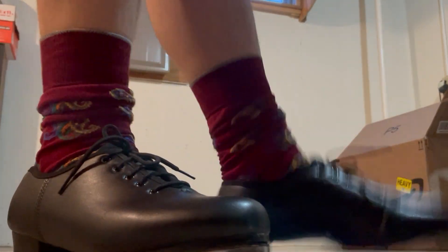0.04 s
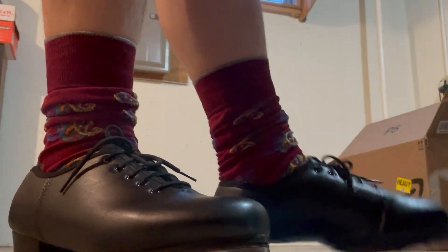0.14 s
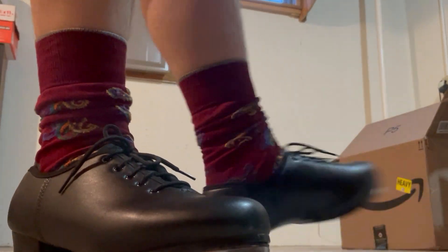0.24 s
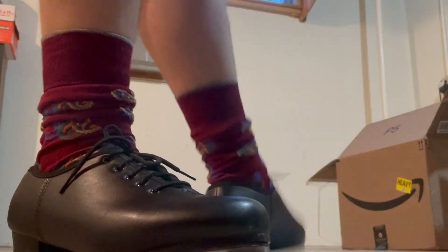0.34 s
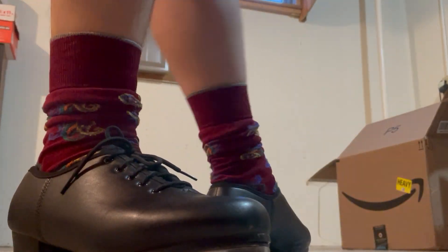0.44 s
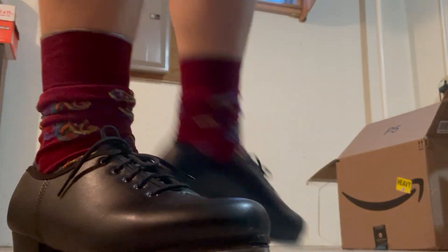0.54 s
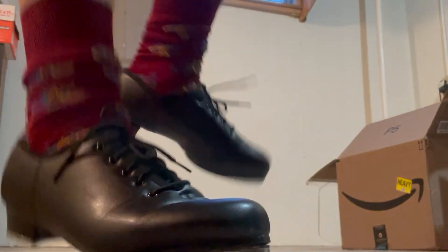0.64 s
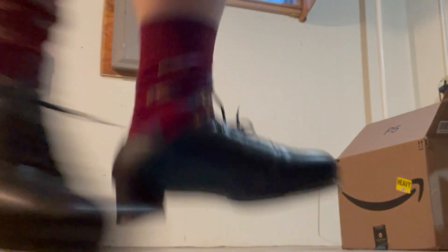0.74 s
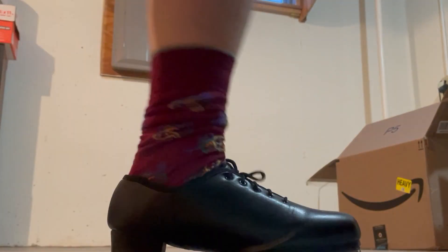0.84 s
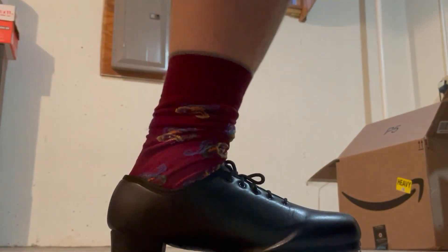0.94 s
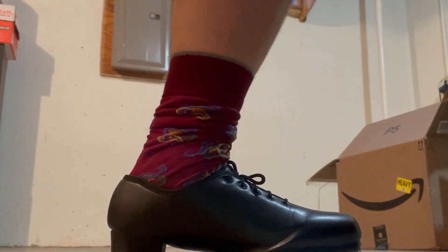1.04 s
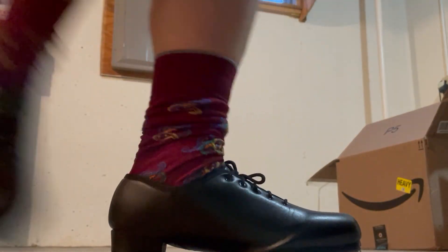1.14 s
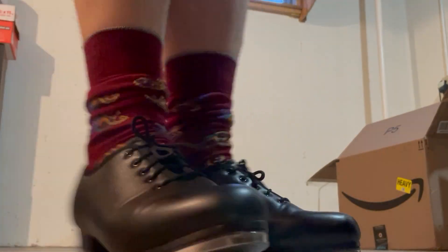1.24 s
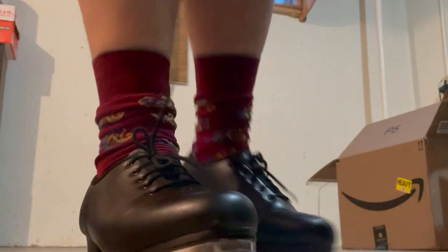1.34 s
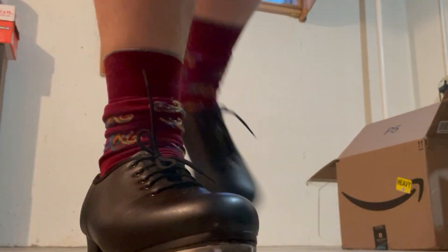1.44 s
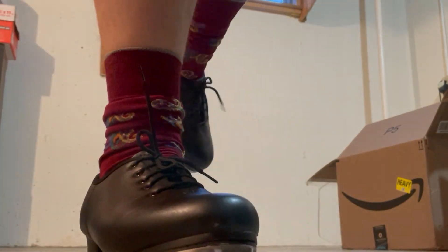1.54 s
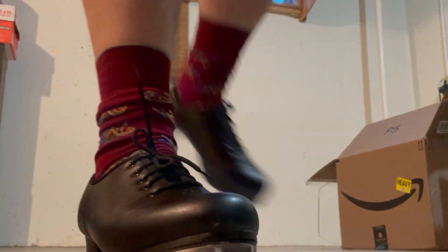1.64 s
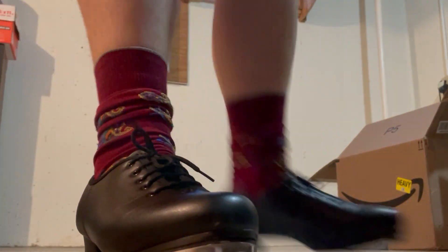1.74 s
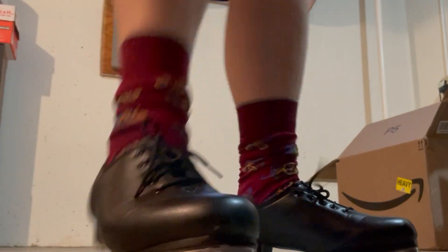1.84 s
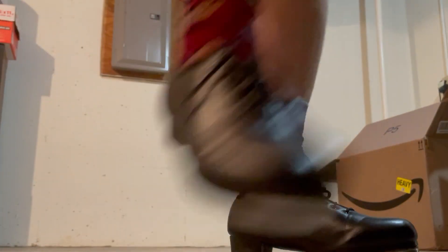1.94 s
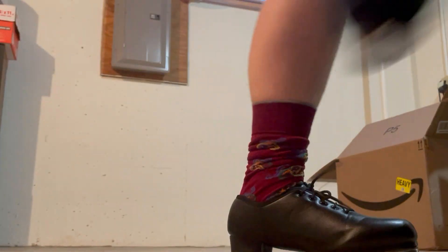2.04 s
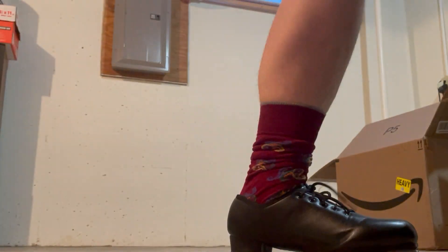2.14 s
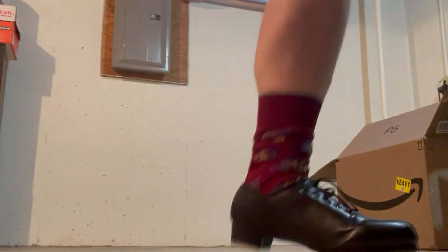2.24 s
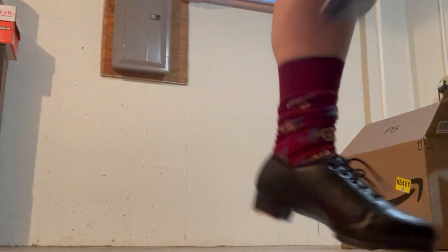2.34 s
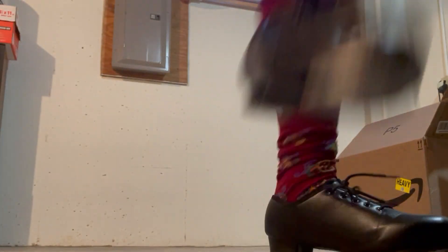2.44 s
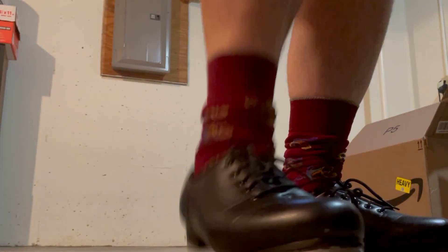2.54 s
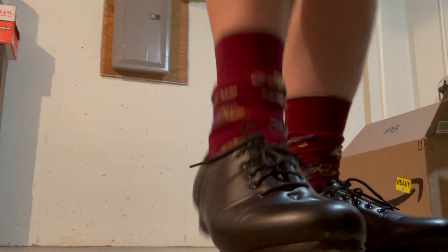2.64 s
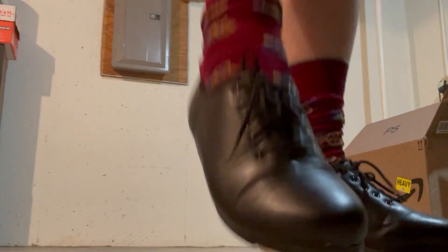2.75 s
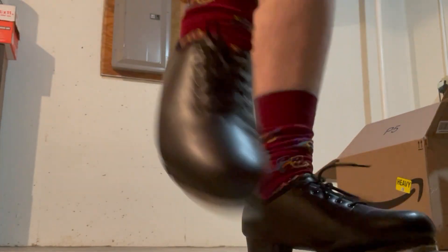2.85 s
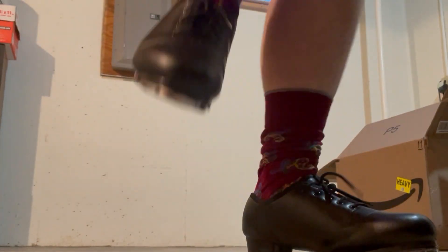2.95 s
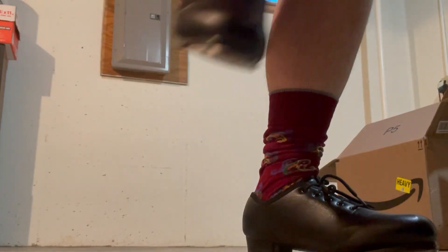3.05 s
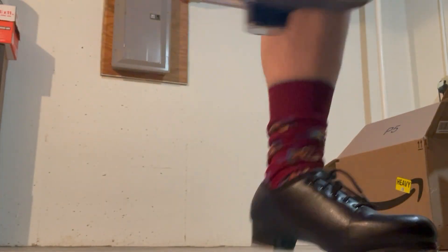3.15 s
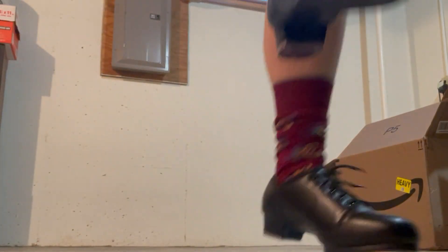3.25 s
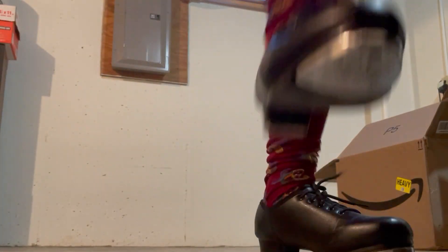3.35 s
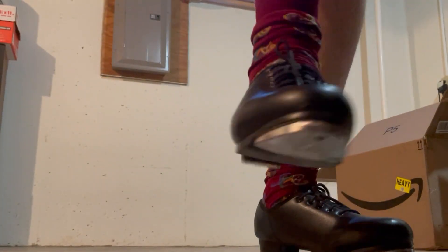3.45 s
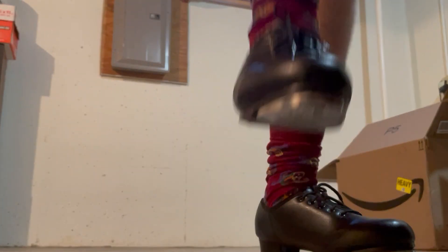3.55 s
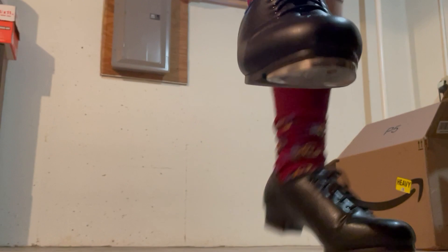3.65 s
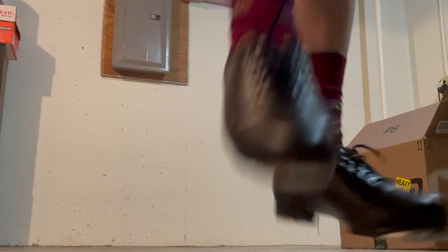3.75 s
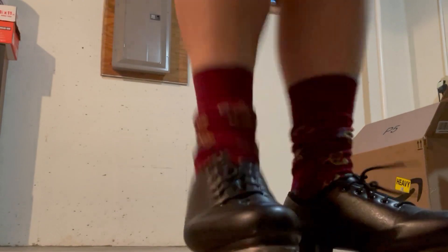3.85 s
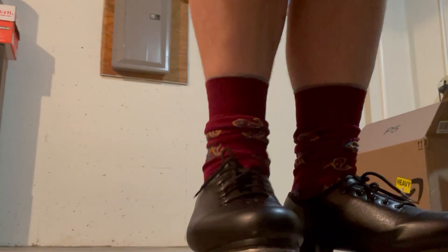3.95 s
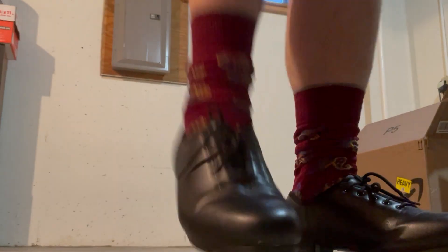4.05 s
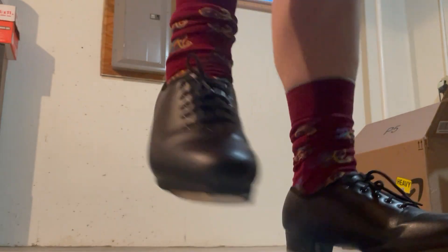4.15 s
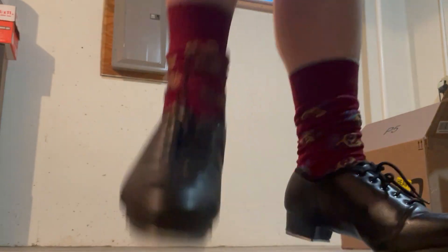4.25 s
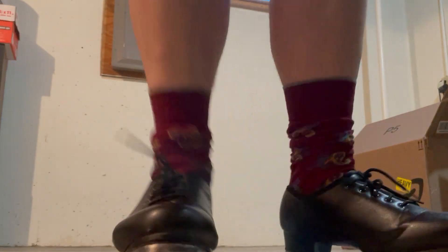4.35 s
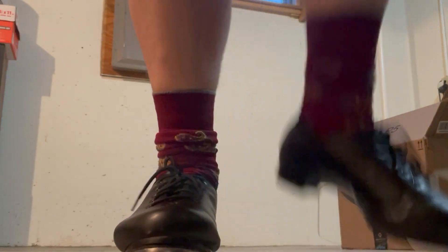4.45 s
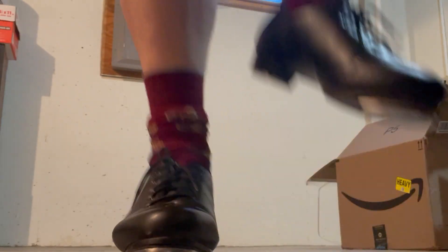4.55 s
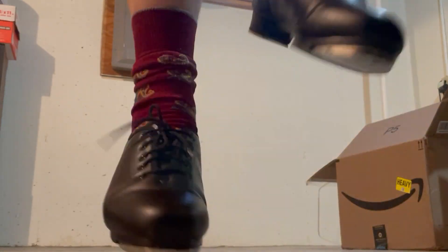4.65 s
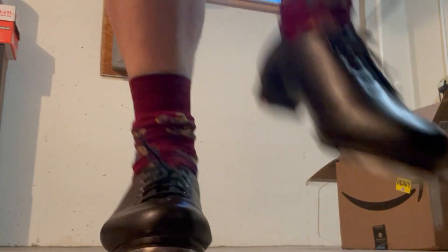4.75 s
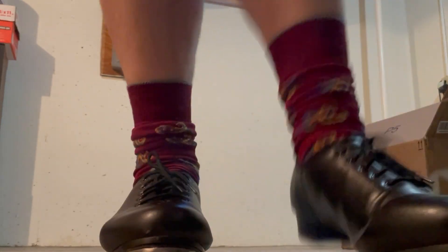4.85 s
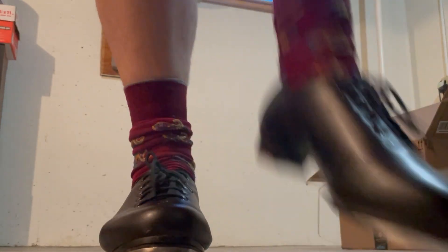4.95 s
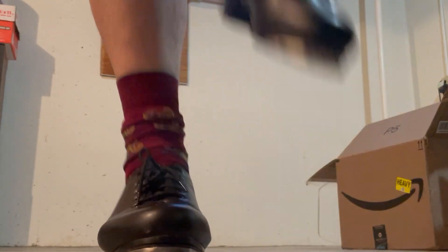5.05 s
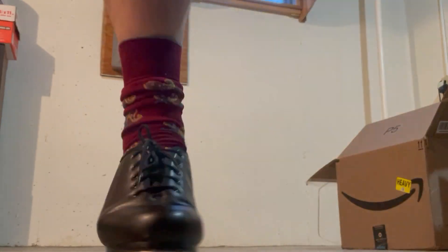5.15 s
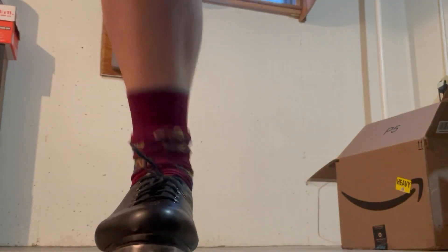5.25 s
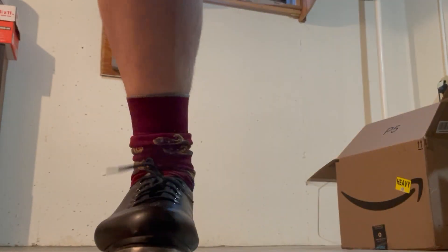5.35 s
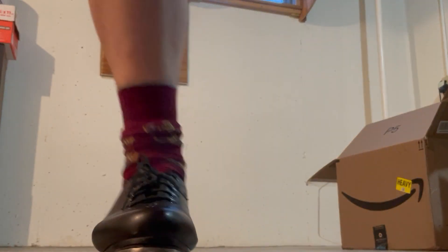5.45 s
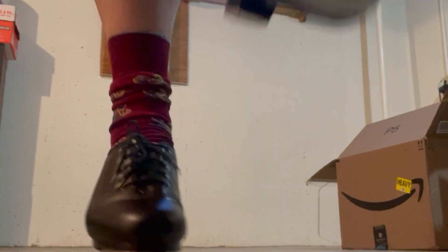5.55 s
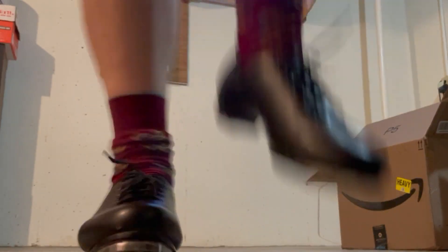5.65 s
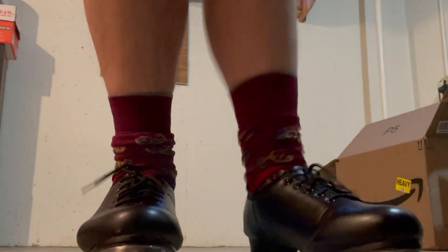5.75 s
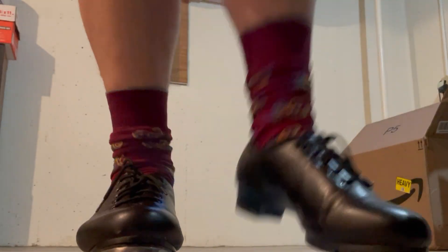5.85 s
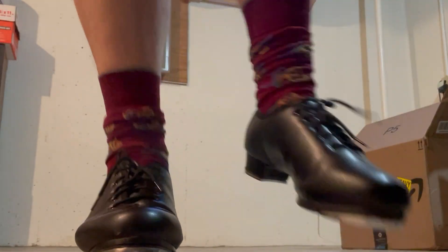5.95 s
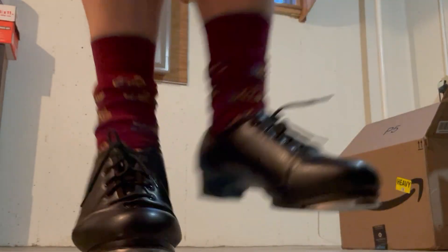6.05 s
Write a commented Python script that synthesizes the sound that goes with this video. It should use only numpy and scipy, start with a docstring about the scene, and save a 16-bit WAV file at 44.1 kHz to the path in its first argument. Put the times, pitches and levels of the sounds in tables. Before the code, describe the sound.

Tap shoes on a hard floor, heard very close from ground level. Sharp metallic clacks with woody heel knocks come alone, in pairs and in tight little rolls, first sparse, then quicker and denser toward the end. Brief sole scuffs brush between some steps. Bare basement walls return a short, bright, boxy reverberation over a very faint hush.

```python
"""A basement with a hard floor and bare walls: tap shoes a step away from a phone lying on the ground.
Chattering contacts drive damped modes of plate, heel and sole: clack, tick, knock and thud, some as echoes.
Dense clicks form scrapes and faint noise swells, noise pulses dull thumps; low room modes boom, a note hums.
Decaying noise bands form the walls' tail, and shaped noise a faint hush, at the phone's two ports."""
import sys
import numpy as np
from scipy import signal
from scipy.fft import rfft, irfft, next_fast_len
from scipy.io import wavfile
from scipy.ndimage import uniform_filter1d

SR = 44100
rng = np.random.default_rng(int(sys.argv[2]) if len(sys.argv) > 2 else 0)


def digitize_waveform(pressure):
    """Quantize a signal to 16-bit integers and store it at the path in sys.argv[1].

    Rows of a 2-D input are taken as channels; values are limited to [-1, 1].
    """
    field = np.atleast_2d(pressure).T
    bounded = np.clip(field, -1, 1)
    quanta = np.round(bounded * 32767).astype(np.int16)
    wavfile.write(sys.argv[1], SR, quanta)


N = 269010

# Plate strikes and their loud early echoes: t/s, clack level/dB, clack f/Hz, then levels/dB re clack:
# knock, thud, tick, rebound, share to the walls
STRIKES_AND_ECHOES = [(0.079, -8.5, 4475, 1, -4, -1.5, -2, -1),
                      (0.3722, -25.5, 2620, -1.5, -4.5, -4, -20, 15),
                      (0.3775, -18, 4560, -4.5, -10, 0, 2.5, -0.5),
                      (0.5385, -36.5, 2200, -4, -20, -15, 2, -13),
                      (0.6265, -39, 2890, -12, -5, -9, -19, -1),
                      (0.6875, -54, 2960, -18.5, 8.5, 7.5, -21.5, 10),
                      (0.7155, -42.5, 2500, 0.5, 5, -5, -13.5, 16.5),
                      (0.7465, -37.5, 2330, -1, -30, 1, -21, 19),
                      (0.784, -10.5, 4070, -17, -40, -5.5, -10, -2.5),
                      (0.79, -13, 3700, -10, -39, -16, -16, 0.5),
                      (0.803, -14, 3850, -6.5, -6.5, 4.5, -1.5, -32),
                      (0.8167, -11, 5050, -2, -2.5, 0, -16.5, -15),
                      (1.1883, -11, 3330, -7, -11, 2, 4.5, -10.5),
                      (1.1945, -13, 3430, -38, -25, -19.5, -4, 2),
                      (1.2005, -11.5, 3660, -13, -44, -12, -17.5, -3.5),
                      (1.2365, -14, 5200, -9, -26.5, -6, -9.5, -15),
                      (1.3145, -23.5, 3440, -6.5, -14.5, 1.5, -31, 3),
                      (1.3335, -24, 4800, 1.5, -21, -24, -11.5, -5),
                      (1.3885, -30.5, 3444, -15, -18, -2, -15.5, -18.5),
                      (1.4765, -40, 2200, -23, -22.5, -31, -19, 8),
                      (1.7788, -9.5, 3040, 2.5, -20.5, -5, -7.5, -4),
                      (1.7905, -13, 3400, -3.5, -11.5, 0.5, 7, -7.5),
                      (1.8005, -15, 4230, -11.5, -4.5, -8, -18, 7),
                      (1.8125, -15, 4940, -12.5, -6, -4, -22.5, -4.5),
                      (2.2115, -55, 2590, -16, -4, -3.5, -7, -10),
                      (2.2485, -48.5, 2830, -21.5, -12, -6.5, -20, 11),
                      (2.4255, -22.5, 3440, -13.5, -9, -10, -23, -7),
                      (2.4320, -3, 3830, -9.5, -17.5, -8.5, -9, -10),
                      (2.4545, -21.5, 4130, -9.5, -0.5, -13, -11, 3.5),
                      (2.5235, -9.5, 3400, -5.5, -4, -1.5, -11.5, -15),
                      (2.5405, -20, 3750, -13, -28, -9.5, -23.5, 10.5),
                      (2.5835, -20.5, 3140, -7.5, -24, -7, -30, 5),
                      (2.8505, -10, 3560, -2.5, -25, -1, -29, -3),
                      (3.1265, -53.5, 3250, -9, -17, -4, -22.5, -3),
                      (3.1425, -40.5, 3040, -10, -14, -6.5, -26, -0.5),
                      (3.3095, -7.5, 3510, 1, -40, 0, -10.5, -1.5),
                      (3.3235, -24.5, 3140, -19, -2, -22, -17, 6),
                      (3.6075, -40, 2830, -24, -22, -26.5, -9, 0),
                      (3.8204, -8.5, 3010, -11, -4, 0.5, -9, -1),
                      (3.8307, -12.5, 4150, -7.5, -17, -16, -31, 3.5),
                      (3.8895, -26, 3830, -1.5, -7, -7, 9, 6), (3.8965, -42, 3210, 10, -14, -9, -37, -11),
                      (4.1605, -48, 3230, -12, -16, -14, -7, -5),
                      (4.2873, -8, 3120, -7, -9, -2.5, -25.5, 0),
                      (4.3035, -15, 4430, -3.5, -19.5, -7, -3.5, 5.5),
                      (4.3674, -18, 3260, 3, -34, 0.5, -4.5, -3.5),
                      (4.3785, -21.5, 3440, -21, -30, -4, -14, 6.5),
                      (4.6485, -47, 3800, 4, 1.5, -10, -18, 10.5),
                      (4.7055, -7, 3290, -7.5, -10.5, -3, -18, 1),
                      (4.7285, -14.5, 3730, -13, -26, -11, -20, 5.5),
                      (4.7846, -26, 3750, -5.5, -31, -4.5, -21, 12),
                      (4.8315, -6.5, 3680, -11.5, -11.5, -6.5, -22, 2.5),
                      (5.2411, -13.5, 3170, 2, -13.5, 1, -23.5, 3.5),
                      (5.6295, -7.5, 3820, 1, -25, -0.5, -13, 1.5),
                      (5.6455, -20.5, 2620, -6.5, -1, -10.5, -13, 11),
                      (5.6565, -16, 3180, -0.5, -15, -6, -22, -0.5),
                      (5.7141, -8, 3330, -11, -9, -2, -20, 1), (5.7305, -13, 4300, -12.5, -19, 0, -16, -12),
                      (5.7599, -9.5, 3840, -0.5, -6, -6, -5.5, -2.5)]
# Soft landings of the sole: t/s, peak level/dB, centre f/Hz
SOFT_LANDINGS = [(2.347, -43.5, 231), (3.701, -40.5, 253), (4.628, -43, 371), (4.958, -42, 302),
                 (5.537, -44.5, 272)]
# Dragging soles and faint noise swells, one perhaps only lingering reverberation:
# loudest t/s, level/dB, swell/s and fade/s (each for 20 dB),
# low grit level/dB and high grit level/dB (both re level)
SCRAPES_AND_SWELLS = [(0.045, -61.5, 0.0035, .04, 8.5, -14), (0.072, -39.5, 0.04, 0.03, 2.5, -17),
                      (0.53, -69, .08, .02, 3, -20), (0.627, -55.5, 0.018, 0.045, 1.5, -8),
                      (0.789, -27.5, 0.055, 0.039, -11, -21), (0.9, -46, 0.029, .45, -2.5, -28),
                      (1.214, -34.5, 0.03, 0.02, -3, -19.5), (1.24, -31, 0.038, 0.0056, -19, -10),
                      (1.34, -38, 0.012, 0.0049, -9.5, -17.5), (1.399, -40, 0.13, 0.029, -7, -21.5),
                      (1.5, -66.5, 0.08, 0.11, -0.5, -19.5), (2.247, -62, 0.0064, 0.11, -8.5, 0),
                      (2.35, -56.5, 0.0097, 0.44, -10, -13), (2.52, -29, 0.015, 0.004, -12.5, -11.5),
                      (2.549, -30, 0.0081, 0.024, -17, -10), (2.7, -42.5, 0.21, .2, -11.5, -29.5),
                      (2.826, -34, 0.05, 0.018, -4, -6.5), (3.148, -57.5, 0.018, 0.02, -4.5, -2),
                      (3.288, -33.5, .05, 0.036, -5.5, -5), (3.607, -63.5, .006, 0.24, -6, -4.5),
                      (3.816, -26, .009, 0.0076, -12, -64), (4.11, -57.5, 0.026, 0.033, 3, -15),
                      (4.66, -77, 0.084, 0.017, 22, 7), (5.198, -47, 0.09, .03, 3.5, -5.5),
                      (5.55, -61, 0.22, 0.6, 0, -5.5)]
# Nominal modes of sole, heel block, low plate and high plate: f/Hz, T60/s
SOLE_MODES = [(110, 0.019), (170, 0.018), (260, 0.018), (390, 0.02), (560, 0.016)]
HEEL_MODES = [(780, 0.0042), (980, 0.0069), (1250, 0.0068), (1550, 0.0058), (1850, 0.0049)]
LOW_PLATE_MODES = [(2250, 0.0069), (2800, 0.0069), (3400, 0.002), (4100, 0.0046), (4800, 0.0031),
                   (5600, 0.006)]
HIGH_PLATE_MODES = [(6700, 0.0021), (7600, 0.0032), (8800, 0.0021), (10200, 0.0014), (11800, 0.00054),
                    (13500, 0.00022), (15200, 0.0005)]
# Body weight coming down on the floor: t/s, relative level/dB
WEIGHT = [(0.075, -40.5), (0.375, -37), (0.804, -37), (1.185, -59), (1.314, -52.5), (1.776, -33.5),
          (2.433, -50.5), (2.521, -37), (2.849, -29.5), (3.321, -24.5), (3.821, -29.5), (4.287, -36.5),
          (4.704, -63), (4.832, -47.5), (5.238, -29), (5.633, -31.5), (5.757, -30)]
# Room modes: f/Hz, relative level/dB, T60/s
ROOM_MODES = [(56.96, -7, 1.15), (70, -1.5, 0.41), (124.9, -2.5, 0.28)]
# Something nearby hums after some steps: t/s, level/dB
HUMS = [(.08, -50.0), (.817, -47.0), (2.524, -55.0)]
# Wall tail, bands half as wide as their centre: f/Hz, T60/s, level/dB, share unlike in the two ports/dB
WALLS = [(136, 0.74, 8.3, -12), (290, 0.61, 2.7, -8.5), (362, 0.81, 2.1, -1), (700, 0.58, 4.5, -2),
         (1110, 0.65, -3.6, -6), (1678, 0.56, 8.5, -2), (2310, 0.28, -4, -22), (3990, 0.49, 4, -15),
         (6630, 0.3, 4, -29.5), (9900, 0.34, 0.5, -41.5), (14900, 0.28, -1.5, -7.5)]
# Further tail bands coloured by far corners: f/Hz, width/Hz, level/dB, T60/s
CORNERS = [(480, 660, -20.5, 0.4), (1430, 140, 1, 0.98), (2140, 1130, 0, 0.74), (3470, 1200, -8, 0.16),
           (6500, 1300, -0.5, 0.63)]
# Spectral shape of the hush: f/Hz, relative level/dB per Hz
HUSH_SPECTRUM = [(18, -36), (30, -11), (59, 5.5), (336, -18.5), (415, -6.5), (844, -11.5), (2290, -24),
                 (8300, -18), (16000, -29.5)]
# Phase by which the left port leads the right: f/Hz, lead/rad
PORT_LEAD = [(0, 0), (1000, .1), (1600, .9), (2500, .5), (3300, .3), (4200, .55), (5300, .3), (6200, 1.5),
             (7100, 1.0), (8550, 3.14), (10500, 6.28), (12600, 9.42), (15000, 12.6), (16700, 13.4)]
# Left port re right port: f/Hz, level/dB
PORT_TILT = [(60, -2.2), (200, -3.3), (500, -1.5), (1100, -2.8), (1800, -2.5), (2500, -.5), (4400, 0.2),
             (15000, 0.1)]

CONTACT_S, REBOUND_S = 0.0023, 0.0038  # decay constant of the contact; delay of the plate's second landing
KNOCK_HZ, KNOCK_HZ_PER_DB = 1000, -34.5  # the more heel in a blow, the deeper its knock
NOTE_T60_S, NOTE_DB, NOTE_TO_WALLS_DB = 0.012, -18.5, -17  # the last is re the direct note
LOW_TO_WALLS_DB = -5  # knock and thud reach the walls weaker than the plate
OWN_COLOUR_DB = -16.0  # share of the blow's own colour that reaches the walls
SPOTS = 5  # places on the floor, each with its own echo pattern
HUM_HZ, HUM_T60_S = 278, 1.2
HUM_WAVER_DB, HUM_WAVER_S = 5.0, 0.04  # rms swing; averaging window, applied twice
ECHO_RISE_S = 0.002
HUSH_DB, WIDE_DB = -68.0, -5.5  # the second: unlike share re the first
TOP_HZ = 17200  # stopband edge of the low-pass
SIZE = next_fast_len(N + SR)
HZ = np.arange(SIZE // 2 + 1) * SR / SIZE


def undb(db):
    """Level and gain: 20 dB is a factor of ten in amplitude."""
    return 10 ** (np.asarray(db) / 20)


def decay(t, t60):
    """Exponential damping: the amplitude falls by 60 dB in t60 seconds."""
    return np.exp(-np.log(1000) * t / t60)


def unit(x):
    """Normalisation of the mean power: scale to rms 1."""
    return x / np.sqrt(np.mean(x ** 2))


def curve(table, column):
    """Spectral interpolation: straight lines between rows on a log frequency axis."""
    rows = np.array(table, float)
    return np.interp(np.log(HZ + 1), np.log(rows[:, 0] + 1), rows[:, column])


def band(x, lo_hz, hi_hz):
    """Band limitation by a Butterworth band-pass."""
    return signal.sosfilt(signal.butter(2, [lo_hz, hi_hz], "band", fs=SR, output="sos"), x)


def add(track, s, x):
    """Superposition: a sound joins the track at s seconds."""
    i = int(s * SR)
    track[i:i + len(x)] += x[:len(track) - i]


def strikes_and_echoes():
    """Impact excitation: strikes and loud early echoes, each sounded twice, direct and as wall sends."""
    near, send = np.zeros(N), np.zeros((SPOTS, N))
    for k, row in enumerate(STRIKES_AND_ECHOES):
        s, db, clack_hz, knock_db, thud_db, tick_db, rebound_db, wall_db = row
        knock_hz = KNOCK_HZ + KNOCK_HZ_PER_DB * knock_db
        low_db = wall_db + LOW_TO_WALLS_DB
        # the rebound takes another spot
        blows = [(2 * k, s, db), (2 * k + 1, s + REBOUND_S, db + rebound_db)]
        for spot, at_s, hit_db in blows:
            # the plate clicks first, the weight of heel and sole follows
            parts = [(0, wall_db, modal_blow(LOW_PLATE_MODES, clack_hz)),
                     (tick_db, wall_db, modal_blow(HIGH_PLATE_MODES)),
                     (0, wall_db, plate_note(clack_hz)),
                     (knock_db, low_db, modal_blow(HEEL_MODES, knock_hz, late_s=0.00076)),
                     (thud_db, low_db, modal_blow(SOLE_MODES, late_s=0.003))]
            # each part radiates its own way, so it meets its own echo pattern
            for way, (part_db, wet_db, (blow, spread)) in enumerate(parts):
                level_db = hit_db + part_db
                add(near, at_s, undb(level_db) * blow)
                to_walls = undb(level_db + wet_db) * spread + undb(level_db + OWN_COLOUR_DB) * blow
                add(send[(spot + way) % SPOTS], at_s, to_walls)
    return near, send


def modal_blow(modes, best_hz=None, late_s=0):
    """Modal superposition: a chattering force drives damped modes; also a smooth pulse for the walls."""
    t = np.arange(1536) / SR
    hz, t60 = np.array(modes, float).T[:, :, None]
    chance = rng.standard_normal((len(modes), 2))
    scatter_gain = undb(6.0 * chance[:, :1])
    scattered_hz = hz * (1 + 0.046 * chance[:, 1:])

    db = 0 * hz
    if best_hz:  # the spot that lands favours the modes near one pitch
        db = -20.0 * np.abs(np.log2(hz / best_hz))
    # neighbouring modes alternate in sign, so that no notch falls between them
    sign = (-1) ** np.arange(len(modes))[:, None]
    gain = undb(db) * sign * decay(t, t60)
    smooth = np.sum(gain * np.sin(2 * np.pi * hz * t), axis=0)
    body = np.sum(scatter_gain * gain * np.sin(2 * np.pi * scattered_hz * t), axis=0)

    chatter = rng.standard_normal(512) * undb(1.8 * rng.exponential(size=512))
    force = chatter * np.exp(-t[:512] / CONTACT_S)
    force[0] = 1.52 * np.max(np.abs(force))  # the first touch is the hardest
    delayed_force = np.append(np.zeros(int(late_s * SR)), force)
    blow = np.convolve(body, delayed_force)[:len(t)]
    # a longer contact of the same height carries more energy
    return unit(blow) * undb(-17.5) * np.sqrt(CONTACT_S * 400), unit(smooth) * undb(-25.5)


def plate_note(hz):
    """Damped free vibration: one clear plate note at the clack pitch, direct and as sent to the walls."""
    t = np.arange(1536) / SR
    tone = undb(NOTE_DB) * unit(np.sin(2 * np.pi * hz * t) * decay(t, NOTE_T60_S))
    return tone, undb(NOTE_TO_WALLS_DB) * tone


def scrapes_and_swells():
    """Stochastic excitation: dense uneven clicks in three bands, as of grit, each rising and fading."""
    t, out = np.arange(N) / SR, np.zeros(N)
    grit = rng.standard_normal(N) * undb(2.5 * rng.exponential(size=N))
    low = unit(band(grit, 480, 1400))
    mid = unit(band(grit, 2200, 5000))
    high = unit(band(grit, 11000, 14000))
    for s, db, swell_s, fade_s, low_db, high_db in SCRAPES_AND_SWELLS:
        shape_db = -20 * np.maximum((s - t) / swell_s, (t - s) / fade_s)
        out += undb(db + shape_db) * (mid + undb(low_db) * low + undb(high_db) * high)
    return out


def soft_landings():
    """Soft impact: a sole set down with a slow push gives a dull thump of band-limited noise."""
    out, t = np.zeros(N), np.arange(4096) / SR
    for s, db, hz in SOFT_LANDINGS:
        push = t * np.exp(-t / 0.0047)
        thump = band(rng.standard_normal(len(t)), hz / 2.0, hz * 1.77) * push
        add(out, s, undb(db) * thump / np.max(np.abs(thump)))
    return out


def room_boom():
    """Room resonance: low modes swell after a heavy step, beat together and decay, for up to 1 s."""
    out, t = np.zeros(N), np.arange(SR) / SR
    for s, step_db in WEIGHT:
        spot_db = 3.5 * rng.standard_normal(len(ROOM_MODES))  # each spot drives the modes in its own mix
        modes = np.zeros(SR)
        for (hz, db, t60), extra_db in zip(ROOM_MODES, spot_db):
            modes += undb(db + extra_db) * decay(t, t60) * np.sin(2 * np.pi * hz * t)
        add(out, s, undb(step_db) * modes * (1 - np.exp(-t / 0.012)))
    return out


def hums():
    """Damped resonance: one low note swells after a step, wavers at random and fades, for up to 1 s."""
    out, t = np.zeros(N), np.arange(SR) / SR
    swell = 1 - np.exp(-t / 0.046)
    tone = np.sin(2 * np.pi * HUM_HZ * t) * decay(t, HUM_T60_S) * swell
    for s, db in HUMS:
        add(out, s, undb(db) * tone)
    size = int(HUM_WAVER_S * SR)
    smoothed = uniform_filter1d(rng.standard_normal(N), size=size)
    waver = unit(uniform_filter1d(smoothed, size=size))
    return out * undb(HUM_WAVER_DB * waver)


def walls(sends):
    """Diffuse reverberation: convolution with decaying noise, a common part and one unlike in the ports."""
    t = np.arange(SR) / SR
    rise = np.clip(t / ECHO_RISE_S, 0, 1) ** 2
    common, unlike = np.zeros((2, len(sends), SR))
    bands = [(hz, hz / 2, db, t60) for hz, t60, db, _ in WALLS] + list(CORNERS)
    for hz, width_hz, db, t60 in bands:
        fade = rise * decay(t, t60)
        # equal noise power per Hz in narrow and wide bands
        gain = undb(db) * fade * np.sqrt(2 * width_hz / SR / np.sum(fade ** 2))
        edges = hz - width_hz / 2, min(hz + width_hz / 2, .45 * SR)
        common += gain * unit(band(rng.standard_normal(common.shape), *edges))
        unlike_db = np.interp(hz, *np.array(WALLS)[:, [0, 3]].T)
        unlike += gain * undb(unlike_db) * unit(band(rng.standard_normal(common.shape), *edges))
    return [signal.fftconvolve(sends, response, axes=1)[:, :N].sum(axis=0)
            for response in (common, unlike)]


def hush():
    """Stationary noise: the quiet of the room by spectral shaping, partly unlike left and right."""
    def shaped_noise():
        spectrum = rfft(rng.standard_normal(SIZE)) * undb(curve(HUSH_SPECTRUM, 1))
        return unit(irfft(spectrum, SIZE)[:N])
    return undb(HUSH_DB) * shaped_noise(), undb(HUSH_DB + WIDE_DB) * shaped_noise()


def scene():
    """Superposition at the two ports: sum and difference of the common and the unlike sound."""
    near, send = strikes_and_echoes()
    soft = scrapes_and_swells() + soft_landings()
    send[0] += undb(-8.0) * soft
    common, unlike = walls(send)
    quiet, wide = hush()
    mid = near + soft + common + undb(-5.0) * room_boom() + hums() + quiet
    # a second draw of the boom mixes its modes differently
    side = unlike + wide + undb(-18.0) * room_boom()
    return np.array([mid + side, mid - side])


def record(dry):
    """Port response: level and phase differences, saturation of the peaks, deep bass and top cut."""
    rows = np.array(PORT_LEAD, float)
    lead = np.interp(HZ, rows[:, 0], rows[:, 1])
    # each port takes half of the difference
    half = undb(curve(PORT_TILT, 1) / 2) * np.exp(.5j * lead)
    ports = irfft(rfft(dry, SIZE) * np.array([half, 1 / half]), SIZE)[:, :N]
    ports = np.tanh(1.132 * ports) / 1.189
    ports = signal.sosfilt(signal.butter(3, 42.0, "high", fs=SR, output="sos"), ports)
    return signal.sosfilt(signal.cheby2(22, 120, TOP_HZ, fs=SR, output="sos"), ports)


dry = scene()
out = record(dry)
digitize_waveform(out)
```